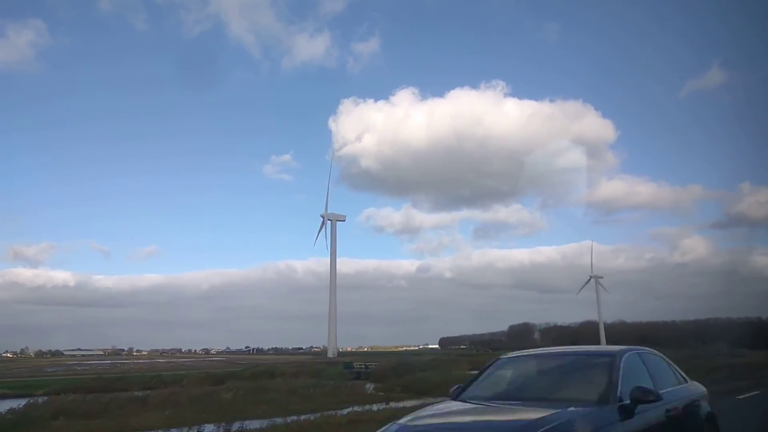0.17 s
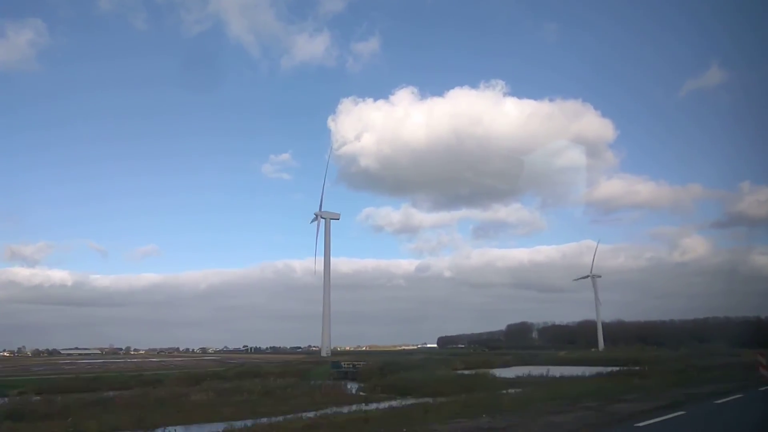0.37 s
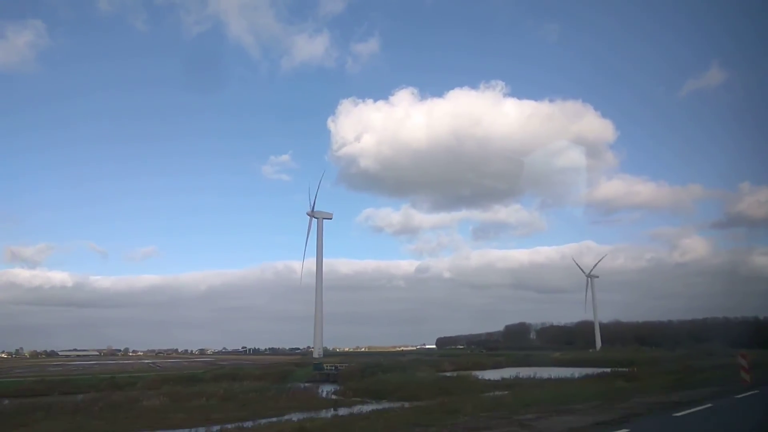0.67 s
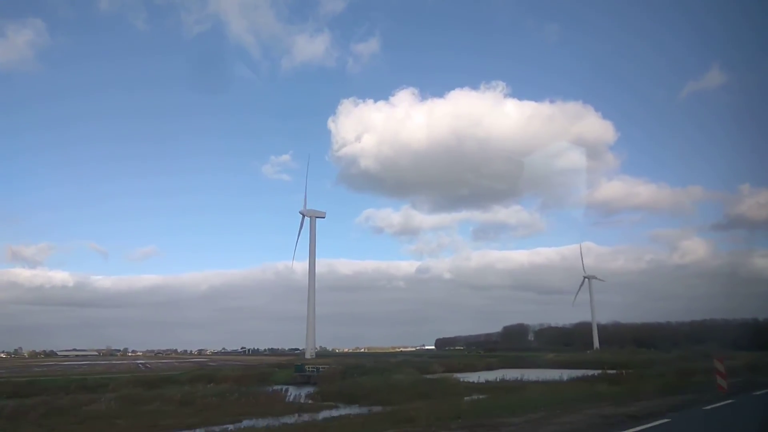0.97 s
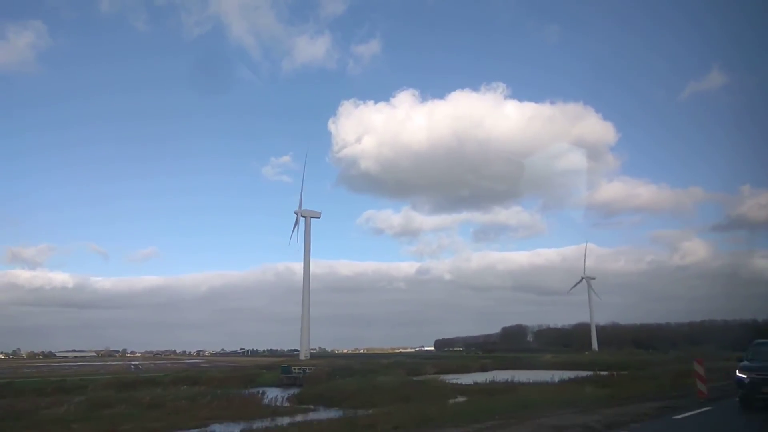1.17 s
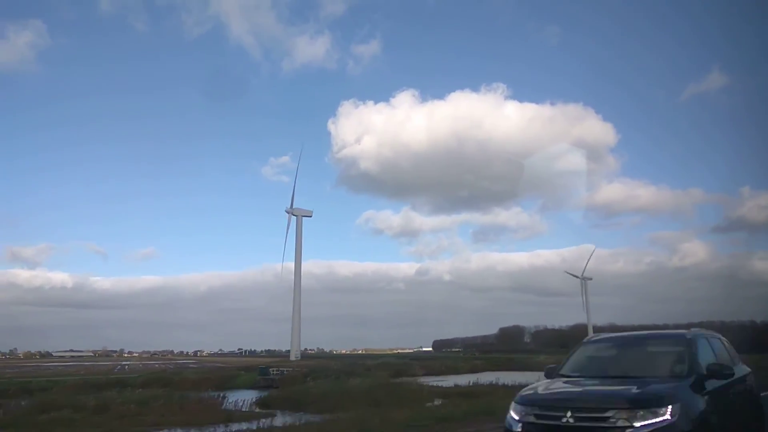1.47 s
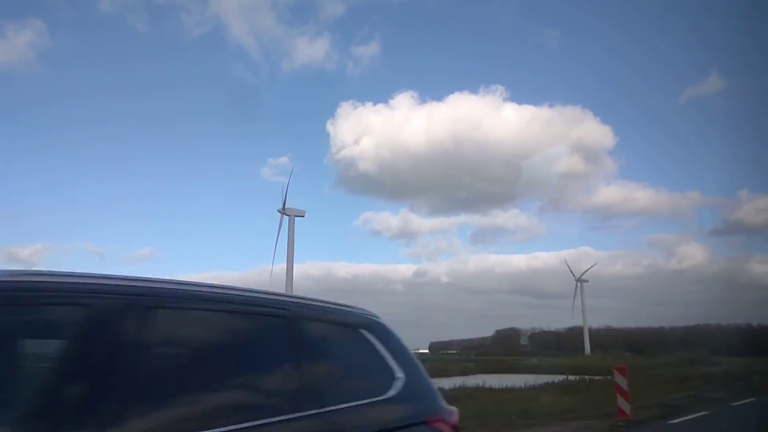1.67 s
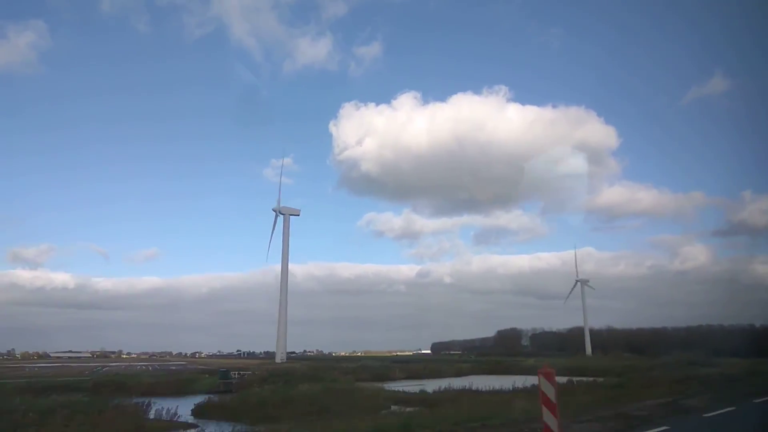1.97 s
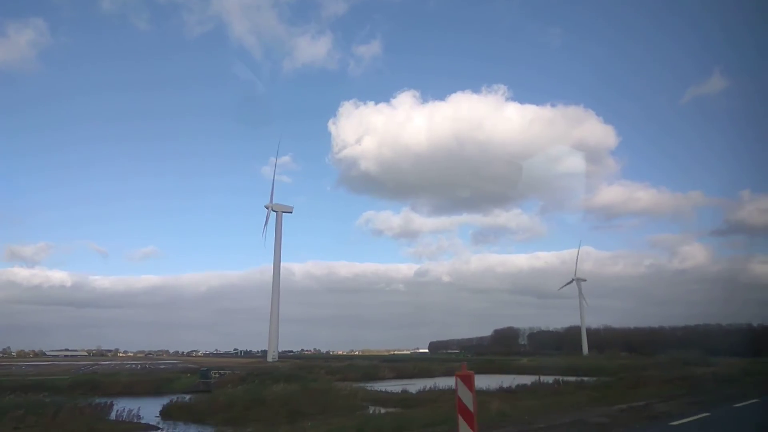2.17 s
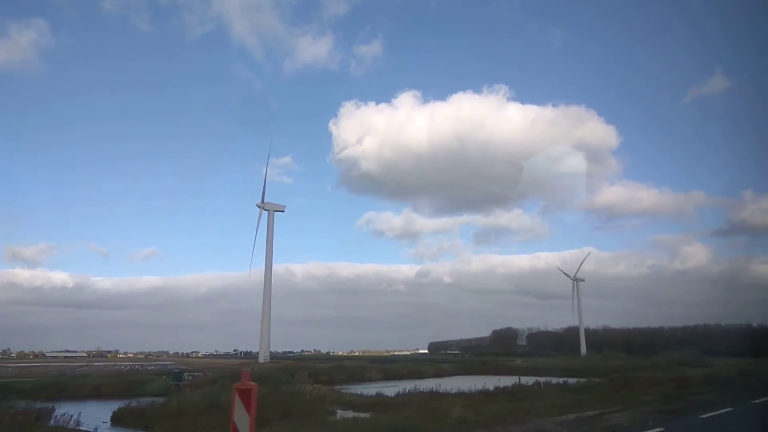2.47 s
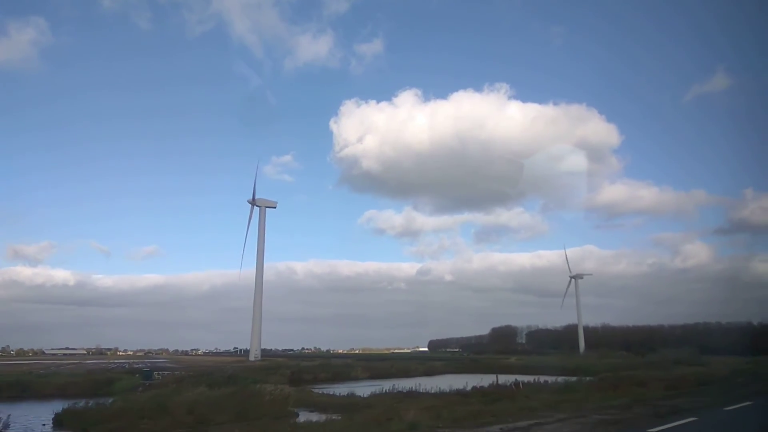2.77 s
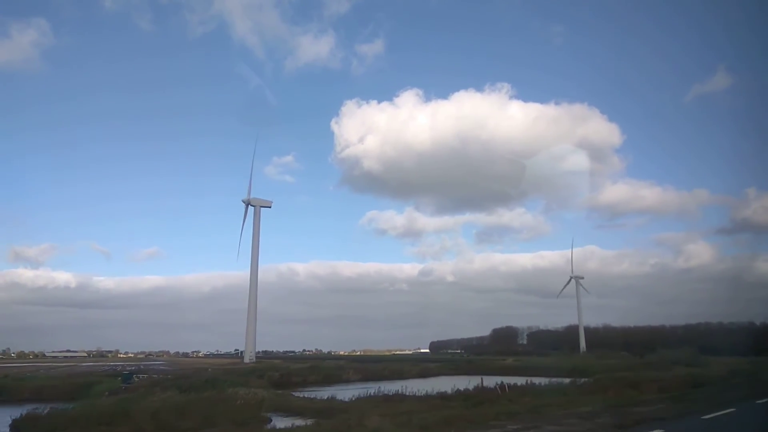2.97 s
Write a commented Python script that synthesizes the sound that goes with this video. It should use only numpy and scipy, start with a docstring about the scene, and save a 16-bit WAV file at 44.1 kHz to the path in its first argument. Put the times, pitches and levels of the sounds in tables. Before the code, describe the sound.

Two oncoming cars whoosh past, heard inside a moving car. The first is already approaching at the start, brightest near 0.4 s and gone by 1 s; the second swells from 1.4 s, peaks near 1.8 s and fades by 2.3 s, both stronger on the right. Uneven low drumming, slowly rising engine hum and dull tyre and wind hiss continue throughout. Brief soft swishes flick by from 2.15 to 3 s.

```python
"""A low, uneven drumming fills a moving car, heard at a two-port microphone by the side window: noise rings the
cabin's low modes. The engine hums as sine orders of a slowly rising note, and wind and tyres add a dull hiss.
Two oncoming cars whoosh past as noise filtered by the window glass, brightest when level with it and strongest
on the right port. Near the end a few short swishes flick by, each a puff of noise."""
import sys
import numpy as np
from scipy import signal
from scipy.fft import rfft, irfft
from scipy.io import wavfile
from scipy.ndimage import uniform_filter1d, map_coordinates

SR = 44100
rng = np.random.default_rng(int(sys.argv[2]) if len(sys.argv) > 2 else 0)


def unload_audio(sound):
    """Save the sound as a 16-bit wav file, at the path given as the first command line argument."""
    columns = np.transpose(np.atleast_2d(sound))
    # keep every value between -1 and 1, then stretch to whole-number steps
    steps = np.round(np.clip(columns, -1, 1) * 32767)
    wavfile.write(sys.argv[1], SR, steps.astype(np.int16))


N = 137592  # samples
TIME_S = np.arange(N) / SR
FREQ_HZ = np.arange(N // 2 + 1) * SR / N + 1e-6
# grid of the short-time spectrum: one column per frame, one row per bin
WINDOW, HOP = 1024, 256  # samples
FRAME_S = np.arange(N // HOP + 2) * HOP / SR
BIN_HZ = np.maximum(np.arange(WINDOW // 2 + 1) * SR / WINDOW, 20)[:, None]
PORT_SIGNS = np.array([[1], [-1]])  # left, right


def undb(db):
    """Decibel law: amplitude ratio of a level difference."""
    return 10 ** (np.asarray(db) / 20)


def unit(x):
    """Normalisation to a root-mean-square amplitude of 1."""
    return x / np.sqrt(np.mean(x ** 2))


def curve(table, t, col=1):
    """Linear interpolation of one table column over time."""
    points = np.array(table)
    return np.interp(t, points[:, 0], points[:, col])


def colour(table, hz):
    """Spectral interpolation in dB along a logarithmic frequency axis."""
    points = np.array(table)
    return np.interp(np.log(hz), np.log(points[:, 0]), points[:, 1])


def random_level(rate_hz):
    """Smoothed randomness: values held for 1 / rate_hz seconds and slewed twice; spread near 1."""
    hold = int(SR / rate_hz)
    steps = np.repeat(rng.standard_normal(N // hold + 1), hold)
    slewed = uniform_filter1d(uniform_filter1d(steps, hold), hold)
    return 1.3 * slewed[:N]


def flicker(rate_hz, count):
    """Band-wise modulation: independent random levels for count bands, blended between neighbours."""
    frame_samples = np.minimum((FRAME_S * SR).astype(int), N - 1)
    rows = np.array([random_level(rate_hz)[frame_samples] for _ in range(count)])
    place = np.clip(np.log(BIN_HZ / 300) / np.log(8000 / 300), 0, 1) * (count - 1)  # 300 Hz to 8 kHz
    return map_coordinates(rows, np.broadcast_arrays(place, np.arange(len(FRAME_S))), order=1)


ALIKE_HZ = 670  # below about this both ports hear the same
ALIKE_HIGH = 0.27  # share still common to both ports in the treble
PORT_LAG_S = 0.00031  # the left port hears later


def airy(spectrum, balance, gain_db):
    """Partial coherence: coloured two-port noise at rms 1, then a gain over frequency and time."""
    alike = ALIKE_HIGH + (1 - ALIKE_HIGH) / (1 + (FREQ_HZ / ALIKE_HZ) ** 3)
    mid, side = rfft(rng.standard_normal((2, N)))
    half_balance_db = colour(balance, FREQ_HZ) / 2
    pair = np.sqrt(1 + alike) * mid + np.sqrt(1 - alike) * side * PORT_SIGNS
    pair = pair * undb([half_balance_db, -half_balance_db])
    pair[0] *= np.exp(-2j * np.pi * FREQ_HZ * PORT_LAG_S)
    noise = unit(irfft(pair * undb(colour(spectrum, FREQ_HZ)), N))
    frames = signal.stft(noise, nperseg=WINDOW, noverlap=WINDOW - HOP, boundary="odd")[2]
    shaped = frames * undb(gain_db)[..., :frames.shape[-1]]
    return signal.istft(shaped, nperseg=WINDOW, noverlap=WINDOW - HOP)[1][:, :N]


DRUM_EVEN_S, DRUM_EVEN = 0.063, 0.67  # averaging time, share of the power swells removed


def even(x):
    """Gain compression: takes part of the slow chance swells out of a rumble."""
    power = uniform_filter1d(np.mean(x ** 2, axis=0), int(DRUM_EVEN_S * SR))
    return unit(x / power ** (DRUM_EVEN / 2))


# cabin resonances, levels relative: frequency_hz, width_hz, level_db
CABIN_MODES = [(51.6, 12, -21), (76.2, 28, -6.5), (86.9, 8.4, -6.5), (120, 58, -7), (147.7, 100, -8.5),
               (187.6, 24, -6), (214.9, 9, -10.5), (243.8, 20, -10), (296, 52, -8.5), (339.8, 31, -13.5),
               (413, 9.9, -21.5)]
# road drumming: start_s, deep_level_db, higher_level_db
ROAD_LEVELS = [(0.0, -38, -36.5), (0.22, -30, -33), (0.3, -46, -33.5), (0.35, -30, -36.5),
               (0.39, -33, -41.5), (0.67, -35.5, -33.5), (0.76, -35.5, -38), (0.8, -41, -43),
               (0.83, -33, -36), (0.99, -34, -36.5), (1.06, -50, -41), (1.09, -27, -35), (1.12, -28.5, -33),
               (1.19, -41, -40), (1.23, -31.5, -38.5), (1.27, -40, -43.5), (1.41, -36.5, -36.5),
               (1.42, -31.5, -40), (1.49, -41.5, -35.5), (1.71, -35.5, -40.5), (1.78, -37.5, -34.5),
               (1.83, -31.5, -32.5), (1.87, -37.5, -34), (2.06, -31.5, -36.5), (2.12, -33.5, -36),
               (2.15, -27.5, -37), (2.33, -40.5, -38.5), (2.42, -34.5, -43.5), (2.46, -31.5, -31),
               (2.51, -27.5, -34.5), (2.56, -44.5, -40), (2.61, -31, -40.5), (2.64, -31, -32.5),
               (2.82, -38.5, -45), (2.95, -27.5, -35), (3.01, -38, -34), (3.07, -34.5, -37.5),
               (3.12, -33.5, -40)]
DEEP_BELOW_HZ = 165  # parts the deep modes from the higher ones
DRUM_SWAY_DB, DRUM_FLICKER_DB = 2.5, 3  # all modes together, each mode alone
# difference between the ports: full from DRUM_SIDE_HZ up, above a small floor
DRUM_SIDE_DB, DRUM_SIDE_HZ, DRUM_DEEP_SIDE_DB = -6, 332, -20.5


def drumming():
    """Modal resonance: random road roughness rings each cabin mode on its own, a little apart at the ports."""
    deep, higher = np.zeros((2, 2, N))
    sway_db = DRUM_SWAY_DB * random_level(18)
    for hz, width_hz, level_db in CABIN_MODES:
        resonance = 1 / (1 + ((FREQ_HZ - hz) / (width_hz / 2)) ** 2)
        rung = irfft(rfft(rng.standard_normal((2, N))) * resonance, N)
        mid, side = unit(rung[0]), unit(rung[1])
        side_gain = undb(DRUM_SIDE_DB) * min(hz / DRUM_SIDE_HZ, 1) ** 3.7 + undb(DRUM_DEEP_SIDE_DB)
        lean = 1 - 0.16 * side_gain * PORT_SIGNS  # slightly to the right
        both_ports = lean * mid + side_gain * side * PORT_SIGNS
        group = higher if hz > DEEP_BELOW_HZ else deep
        group += undb(level_db + sway_db + DRUM_FLICKER_DB * random_level(14)) * both_ports
    deep_gain = undb(curve(ROAD_LEVELS, TIME_S))
    higher_gain = undb(curve(ROAD_LEVELS, TIME_S, col=2))
    return even(deep) * deep_gain + even(higher) * higher_gain


# engine note: start_s, pitch_hz, level_db
ENGINE_NOTE = [(0, 144.6, -38.5), (.4, 145, -46), (.7, 146.4, -38), (1.0, 147.3, -48), (1.3, 148.2, -41),
               (1.55, 150.4, -33.5), (1.75, 150, -41), (2.05, 152.2, -28), (2.3, 154.2, -36.5),
               (2.5, 154.7, -31.5), (2.75, 158, -32.5), (3.12, 157.6, -33.5)]
# engine orders: multiple of the note, level_db relative to it
ENGINE_ORDERS = [(.5, -4.5), (1, -0.5), (1.5, -13.5), (2, -15.5)]


def engine():
    """Harmonic synthesis: a few orders of the firing note, each wavering in level."""
    pitch_hz = curve(ENGINE_NOTE, TIME_S) * (1 + 0.0021 * random_level(9.7))
    phase = 2 * np.pi * np.cumsum(pitch_hz) / SR
    hum = 0
    for multiple, level_db in ENGINE_ORDERS:
        gain = undb(level_db + 1.9 * random_level(16))
        hum = hum + gain * np.sin(multiple * phase + 2 * np.pi * rng.random())
    return np.sqrt(2) * hum * undb(curve(ENGINE_NOTE, TIME_S, col=2))


# hiss colour, relative density: frequency_hz, density_db per Hz
HISS_COLOUR = [(220, -39), (380, -15.5), (399, -2.5), (534, -5), (626, -12.5), (935, -13.5), (1140, -21),
               (1190, -17.5), (1580, -20.5), (2110, -32), (2220, -30), (6960, -50.5), (9050, -81),
               (15300, -120)]
# hiss port balance: frequency_hz, left_minus_right_db
HISS_BALANCE = [(400, 1.5), (800, -6), (1400, 0), (2300, 1), (3200, -3.5), (4000, -8.5), (5000, -4),
                (6500, 1.5)]
# hiss swells, before the treble share and trim: start_s, level_db
HISS_SWELLS = [(0.05, -52), (0.12, -49.5), (0.65, -54), (0.73, -49.5), (1.36, -51.5), (1.4, -51),
               (1.71, -45.5), (2.42, -47.5), (2.45, -39), (2.57, -44), (2.83, -45.5), (2.95, -41.5),
               (3.08, -44)]
HISS_TREBLE_SHARE, HISS_STEADY_DB = .5, -44  # treble follows this share of each swell around this level


def hiss():
    """Broadband turbulence: own tyres and wind heard through the body; bands sway broadly and flicker finely."""
    share = HISS_TREBLE_SHARE + (1 - HISS_TREBLE_SHARE) / (1 + (BIN_HZ / 1500) ** 2)
    level_db = HISS_STEADY_DB + share * (curve(HISS_SWELLS, FRAME_S) - HISS_STEADY_DB)
    trim_db = -1.0
    sway_db = 2.0 * flicker(18, count=3)
    fine_db = 1.2 * flicker(17, count=14)
    return airy(HISS_COLOUR, HISS_BALANCE, level_db + trim_db + sway_db + fine_db)


# short swishes, levels before the split into body and top: peak_s, body_db, top_db, rise_s, fall_s
SWISH_EVENTS = [(2.15, -65.5, -61.5, .006, .011), (2.215, -57.5, -62, .008, .012),
                (2.409, -56, -59, .008, .015), (2.45, -61.5, -64, .015, .018),
                (2.624, -43.5, -53.5, 0.0046, .01), (2.91, -58, -69, .01, .015),
                (2.945, -48.5, -49, 0.014, 0.032), (2.998, -58.5, -54, .015, .035)]
# swish colour, relative density: frequency_hz, density_db per Hz
SWISH_COLOUR = [(530, -28), (900, 0.5), (1260, -14), (1450, -6), (1980, -21.5), (2560, -21), (4270, -24.5),
                (5070, -18.5), (6960, -34.5), (9050, -66.5), (15300, -120)]
# swish port balance: frequency_hz, left_minus_right_db
SWISH_BALANCE = [(1000, -5.5), (2500, -8), (4000, -3), (5000, -4), (6500, -3)]
SWISH_SPLIT_HZ, SWISH_FLICKER_DB = 4600, 2.5


def swishes():
    """Exponential envelopes: puffs of noise, mostly quicker to rise than to fade, each with its own brightness."""
    body_filter_db = -10 * np.log10(1 + (BIN_HZ / SWISH_SPLIT_HZ) ** 8)
    top_filter_db = -10 * np.log10(1 + (SWISH_SPLIT_HZ / BIN_HZ) ** 8)
    out = 0
    for part, filter_db in ((1, body_filter_db), (2, top_filter_db)):
        envelope = 0
        for event in SWISH_EVENTS:
            peak_s, rise_s, fall_s = event[0], event[3], event[4]
            after_s = TIME_S - peak_s
            decay = np.where(after_s < 0, after_s / rise_s, -after_s / fall_s)
            envelope = envelope + undb(event[part]) * np.exp(decay)
        gain_db = filter_db + SWISH_FLICKER_DB * flicker(30, count=14)
        out = out + envelope * airy(SWISH_COLOUR, SWISH_BALANCE, gain_db)
    return out


# narrow band passed by the glass
BAND_OCT, BAND_LEFT_DB, BAND_RIGHT_DB = 0.059, 2, 9
BAND_RISE_HZ, BAND_STAYS, BAND_WIDENS = 800, .6, 1.9  # climb; share left and extra width when level
BAND_FADE_S, BAND_TURN_S = 0.11, 0.045  # delay of the first band's fade, time of each change
# treble edge, above which the glass shuts
EDGE_OVER_BAND, EDGE_RISE_HZ, EDGE_LIFT_DB, SHUT_DB_PER_OCT = 1.06, 3000, 1, 49


def glass(at_s, half_s, ahead_hz, behind_hz):
    """Angle-dependent transmission: a band climbs, then drops once behind; the treble edge peaks when level."""
    x = (FRAME_S - at_s) / half_s
    near = 1 / (1 + x ** 2)

    def hump(hz):
        width_oct = BAND_OCT * (1 + BAND_WIDENS * near)
        return np.exp(-(np.log2(BIN_HZ / hz) / width_oct) ** 2 / 2)

    def step(late_s):
        return (1 + np.tanh((FRAME_S - at_s - late_s) / BAND_TURN_S)) / 2

    climb_hz = ahead_hz + BAND_RISE_HZ * np.where(x < 0, near ** 2, 1)
    ahead = hump(climb_hz) * (1 - step(BAND_FADE_S))
    behind = hump(behind_hz) * step(BAND_TURN_S)
    band = np.maximum(ahead, behind) * (1 - (1 - BAND_STAYS) * near ** 2)
    band_hz = ahead_hz + (behind_hz - ahead_hz) * (1 + np.tanh(x)) / 2
    over_oct = np.log2(BIN_HZ / (EDGE_OVER_BAND * band_hz + EDGE_RISE_HZ * near))
    edge_db = EDGE_LIFT_DB * np.exp(-(over_oct / 0.13) ** 2 / 2) - SHUT_DB_PER_OCT * np.maximum(over_oct, 0)
    return np.array([BAND_LEFT_DB * band, BAND_RIGHT_DB * band]) + edge_db


TREAD_DOPPLER, TREAD_OCT, TREAD_LEAD_S = .12, .18, .04  # pitch shift share, width, lead before level


def tread(at_s, half_s, tread_hz, tread_db):
    """Doppler shift: the tyre tread note drops in pitch as its car passes."""
    y = (FRAME_S - at_s + TREAD_LEAD_S) / half_s
    note_hz = tread_hz * (1 - TREAD_DOPPLER * np.tanh(2 * y))
    return tread_db * np.exp(-(np.log2(BIN_HZ / note_hz) / TREAD_OCT) ** 2 / 2) / (1 + y ** 2)


# oncoming cars' colour through the glass, relative density: frequency_hz, density_db per Hz
CAR_COLOUR = [(210, -34), (350, 4.5), (438, -6), (516, -9), (585, -2), (760, -3), (830, -1), (1010, -5.5),
              (1400, -11.5), (1670, -12), (2370, -18), (4060, -22), (4660, -22), (6070, -28.5),
              (6960, -38.5), (9050, -68), (15300, -120)]
# oncoming cars' port balance: frequency_hz, left_minus_right_db
CAR_BALANCE = [(350, 0), (800, -4.5), (1400, -9), (2300, -6), (3000, -12), (3900, -10.5), (5000, -9.5),
               (6500, -6)]
# one table per car, before CAR_GAIN_DB: start_s, level_db, extra_middle_db (fading out above MIDDLE_HZ)
CAR_LEVELS = [
    [(0, -56, -4.5), (.15, -55, -2), (.29, -51, -4), (.38, -52.5, -1.5), (.52, -55.5, 0.5), (.62, -56, 0),
     (.72, -55.5, -5), (.78, -61, -8), (.9, -65.5, -10), (.95, -79, 14.5), (1.05, -77.5, 6)],
    [(1.2, -77.5, 4), (1.38, -73.5, 7), (1.4, -61, 5), (1.5, -56, -4), (1.66, -50.5, -5), (1.74, -50, -4),
     (1.81, -54.5, 0), (1.87, -50.5, -7), (1.97, -57.5, 1), (2.12, -61.5, 0), (2.24, -66, 7),
     (2.36, -79.5, -12), (2.42, -78, -4)],
]
# one row per car: level_with_window_s, half_fall_s (of the edge's rise), ahead_band_hz (before its climb),
# behind_band_hz, tread_pitch_hz (before Doppler shift), tread_peak_db
CAR_PASSINGS = [(0.43, .14, 3740, 3420, 1810, 4), (1.792, 0.12, 3830, 3580, 1862, 6.5)]
CAR_GAIN_DB, CAR_FLICKER_DB, MIDDLE_HZ = 13, 2.5, 2330


def cars():
    """Moving-source filtering: each oncoming car's tyre roar, shaped by the side window and its tread note."""
    out = 0
    for passing, levels in zip(CAR_PASSINGS, CAR_LEVELS):
        at_s, half_s, ahead_hz, behind_hz, tread_hz, tread_db = passing
        outside = (FRAME_S < levels[0][0]) | (FRAME_S > levels[-1][0])
        level_db = curve(levels, FRAME_S) + CAR_GAIN_DB - 120 * outside
        middle_db = curve(levels, FRAME_S, col=2) / (1 + (BIN_HZ / MIDDLE_HZ) ** 4)
        filter_db = glass(at_s, half_s, ahead_hz, behind_hz) + tread(at_s, half_s, tread_hz, tread_db)
        wobble_db = 0.88 * flicker(10.56, count=2) + CAR_FLICKER_DB * flicker(30.02, count=48)
        out = out + airy(CAR_COLOUR, CAR_BALANCE, level_db + middle_db + filter_db + wobble_db)
    return out


CABIN_T60_S, CABIN_WET_DB = .05, -9  # reverberation time, reflections relative to direct sound


def cabin(x):
    """Reverberation: a quick dense tail of reflections, its own at each port."""
    t = np.arange(SR // 5) / SR
    tail = rng.standard_normal((2, len(t))) * undb(-60 * t / CABIN_T60_S)
    tail = undb(CABIN_WET_DB) * tail / np.sqrt(np.sum(tail ** 2, axis=1, keepdims=True))
    reflections = irfft(rfft(x) * rfft(tail, N), N)
    return (x + reflections) / np.sqrt(1 + undb(2 * CABIN_WET_DB))


def scene():
    """Superposition: rumble and hum add directly; the airy sounds also reflect in the cabin."""
    return drumming() + engine() + cabin(hiss() + swishes() + cars())


LOW_CUT_HZ, ROLL_HZ, TOP_HZ = 39, 6760, 15700
MIC_NOISE_DB = -87.5  # before the top cut


def record(dry):
    """Band-limited transduction: rolls off deep bass and treble, adds faint noise and cuts the top."""
    lead = 4096  # samples of mirrored sound, so the filters are already running when the scene opens
    x = np.pad(dry, ((0, 0), (lead, 0)), mode="reflect", reflect_type="odd")
    x = signal.sosfilt(signal.butter(10, ROLL_HZ, fs=SR, output="sos"), x)
    x = signal.sosfilt(signal.butter(2, LOW_CUT_HZ, "high", fs=SR, output="sos"), x)
    x = x + undb(MIC_NOISE_DB) * rng.standard_normal(x.shape)
    return signal.sosfilt(signal.ellip(8, .2, 70, TOP_HZ, fs=SR, output="sos"), x)[:, lead:]


dry = scene()
out = record(dry)
unload_audio(out)
```